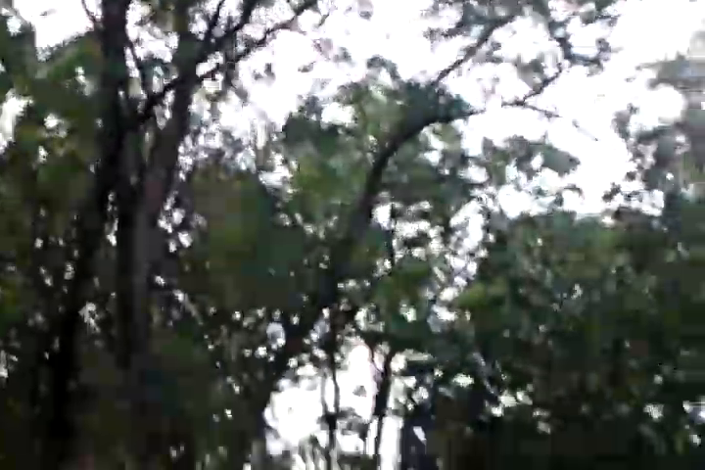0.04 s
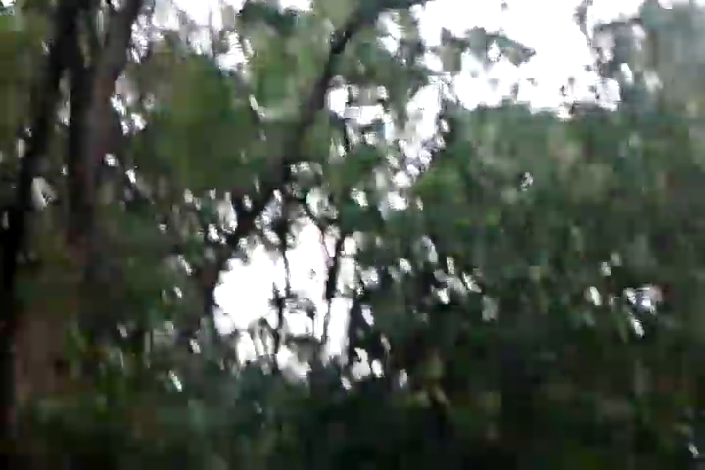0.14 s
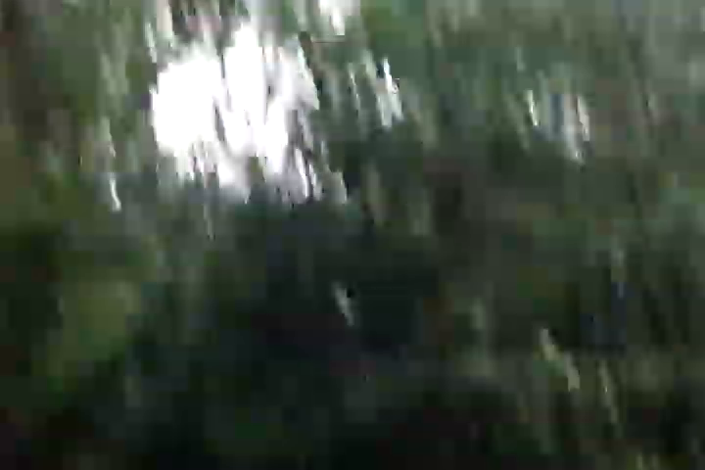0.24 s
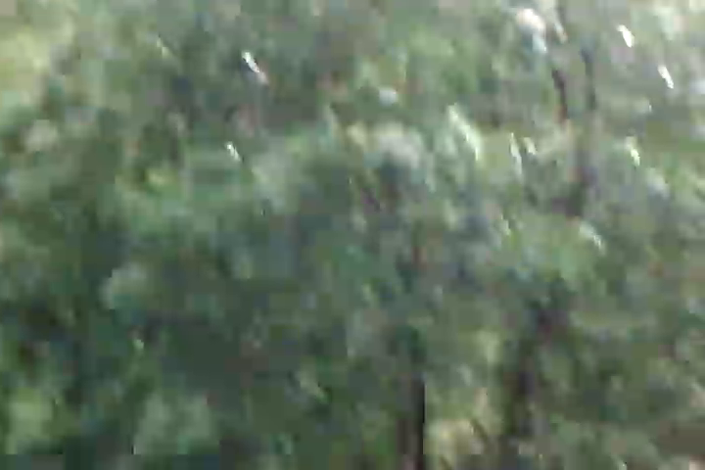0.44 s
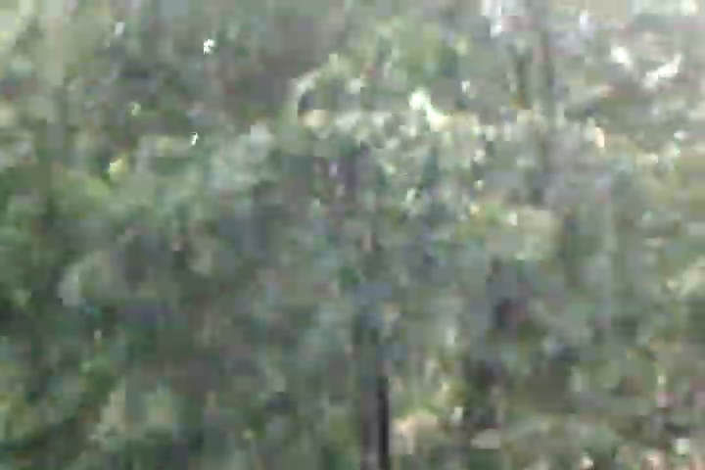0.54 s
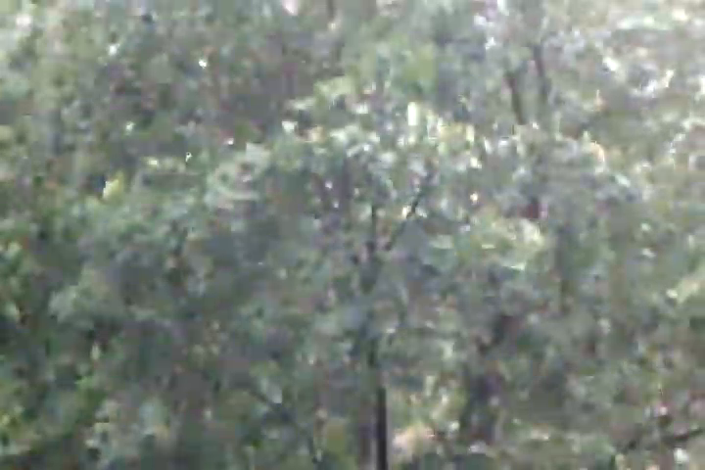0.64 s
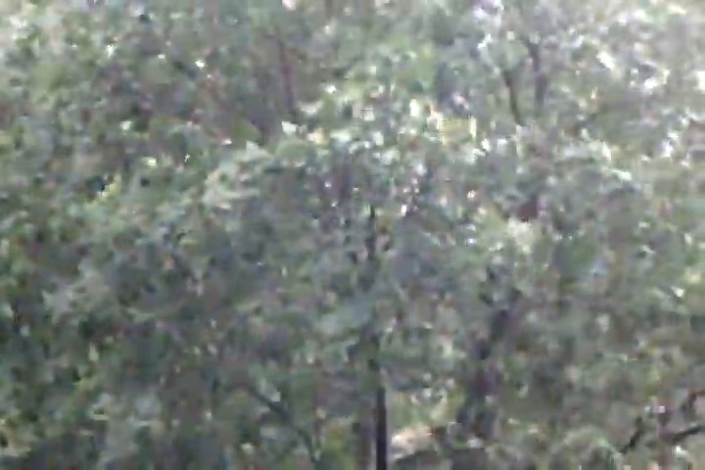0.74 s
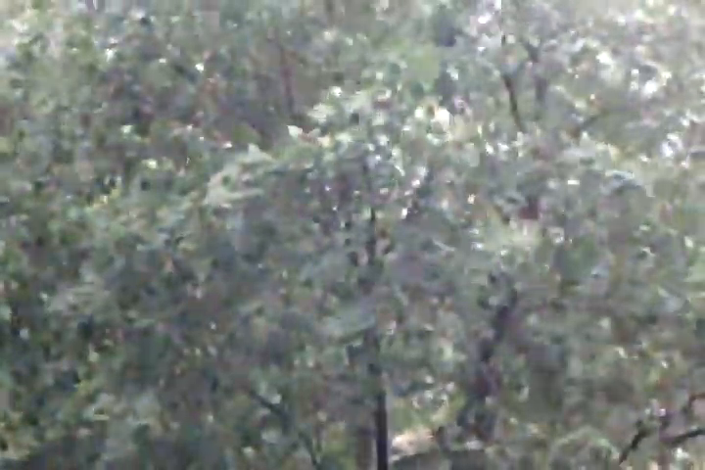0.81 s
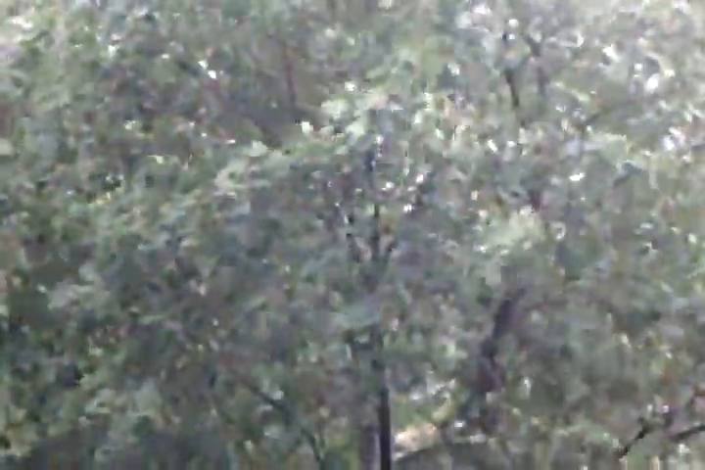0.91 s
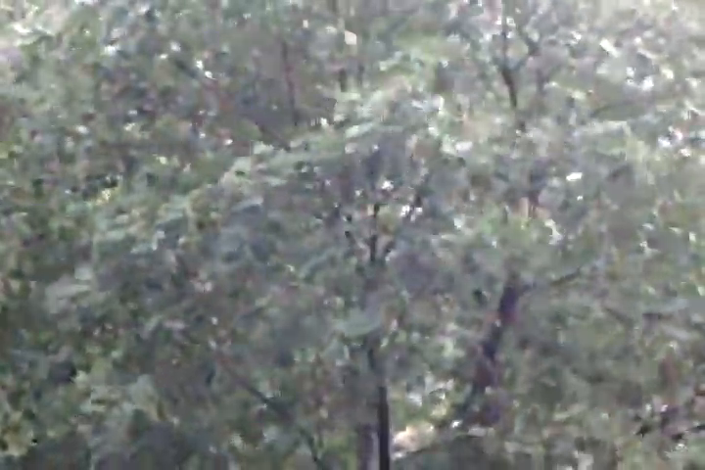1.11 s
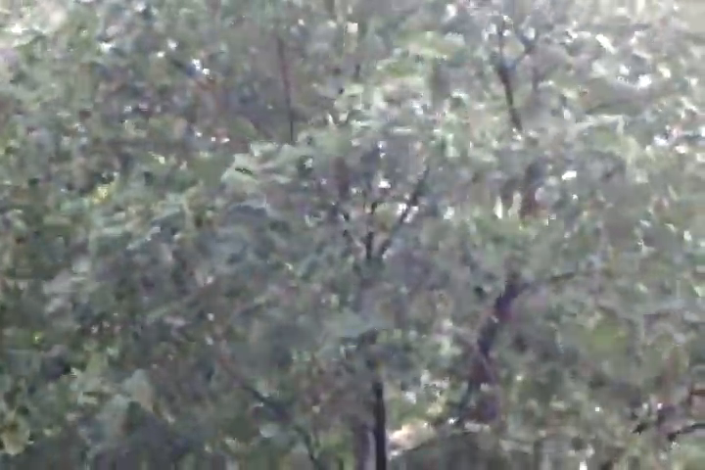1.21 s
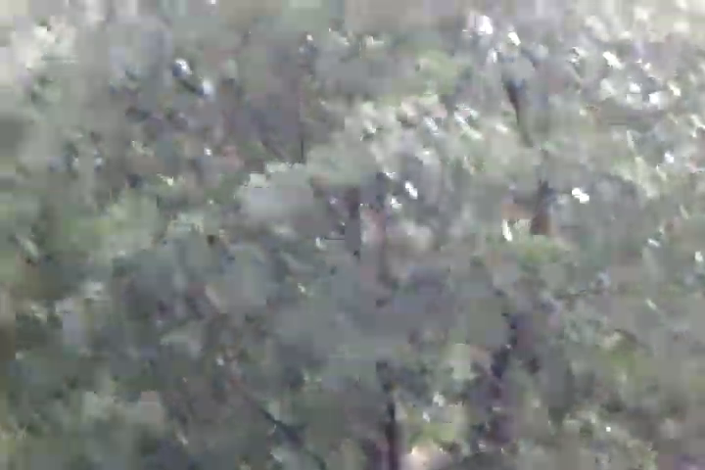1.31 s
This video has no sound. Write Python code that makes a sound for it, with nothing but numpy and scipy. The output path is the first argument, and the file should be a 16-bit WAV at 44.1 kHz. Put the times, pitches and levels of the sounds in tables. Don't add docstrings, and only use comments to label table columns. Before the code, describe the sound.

A steady downpour on trees all around, dull roar under fine leaf patter; near the start a rapid cluster of very close clacks and cracks from gripping the device, the hardest distorting, then mostly undisturbed rain.

```python
import sys
import numpy as np
from scipy import signal
from scipy.io import wavfile

SR = 44100
rng = np.random.default_rng(int(sys.argv[2]) if len(sys.argv) > 2 else 0)


def volts_from_decibels(level):
    exponent = np.asarray(level, float) / 20
    return 10 ** exponent


def store_wav(level_fs):
    pcm = np.round(np.clip(np.atleast_2d(level_fs), -1, 1) * 32767)
    wavfile.write(sys.argv[1], SR, pcm.T.astype(np.int16))


N = 59535

# time in seconds, level in dB.
RAIN_STRENGTH = [
    (0.0, -37),
    (0.202, -35),
    (0.322, -33),
    (0.946, -34.5),
    (1.35, -34),
]
# frequency in Hz, density in dB per Hz.
ROAR_SPECTRUM = [(35, -64), (60, -41), (109, -14), (205, -5.5), (244, -2), (512, -0.5), (629, 0),
                 (1670, -8), (2600, -17.5), (3380, -43), (5720, -120)]
# frequency in Hz, density in dB per Hz.
PATTER_SPECTRUM = [(1500, -24), (2600, 0.5), (3900, 0), (5000, -3.5), (6300, -10), (8500, -4), (11000, -10),
                   (14000, -18.5)]
# time in seconds, level in dB.
GRIP_PRESSURE = [
    (.17, -39),
    (.205, -39),
    (.235, -27),
    (.262, -26.5),
    (.3, -37.5),
    (.35, -30),
    (.41, -38.5),
    (.47, -32),
    (.53, -60),
]
# frequency in Hz, bandwidth in Hz, level in dB.
CASE_MODES = [
    (241, 93, -6.5),
    (600, 370, -0.2),
    (1046, 750, -4),
    (2060, 1250, -4),
    (3800, 2200, -15.5),
]
# time of peak in seconds, peak level in dB, pitch in Hz,
# length in cycles, pitch sag per cycle.
CASE_KNOCKS = [(.194, -25, 600, 2.1, 0.059), (0.2263, -13, 600, 1.62, 0.16), (.233, -29, 700, 0.99, .05),
               (.243, -18, 750, 1, .05), (0.2459, -49, 890, 2.2, .05), (.2568, -6.5, 860, 0.97, 0.072),
               (.266, -47, 710, 5.8, 0.09), (.271, -30, 705, 1.5, .05), (.298, -29, 705, 6.3, 0.079),
               (0.317, -42, 510, 2.8, .05), (0.3342, -15, 520, 1.2, 0.59), (.3368, -24.5, 270, 1.7, 0.11),
               (.35, -22, 380, 1.4, 0.13), (0.3965, -15, 700, 3.8, 0.66), (.4015, -31, 644, 0.72, .1),
               (0.4513, -12.5, 564, 1.4, 0.51), (0.4551, -23, 420, 0.9, .1),
               (.4675, -16.5, 860, 0.99, 0.12), (.508, -49, 400, 2.2, 0.12), (.755, -26.5, 1310, 3.1, 0.15)]
# time of peak in seconds, peak level in dB, pitch in Hz,
# length in cycles, level of the crack in dB relative to the ring.
CASE_SNAPS = [(.23803, -5.5, 2450, 1.9, -30), (.23803, -12, 4500, 2.8, -25), (.239, -17, 3300, 2.6, -25),
              (.25456, 6, 1950, 1.3, -22), (.25535, -8, 3650, 3.1, -25), (.25445, -13, 5200, 2.1, -8),
              (.331, -18, 2400, 2.1, -18), (.4728, -16, 1900, 1.3, -5), (.4738, -21, 2000, 2.8, -12),
              (.2128, -27, 2800, 2.1, -12), (.2225, -22, 2500, 4.1, -20), (.226, -24, 2400, 4.1, -20),
              (.3463, -22, 4000, 3.1, -14), (.3804, -21, 1600, 2.1, -10), (.3803, -24, 4500, 3.1, -8),
              (.3937, -23, 2800, 2.1, -10), (.4676, -22, 2800, 1.6, -7), (.7528, -27, 2600, 2.1, -12),
              (1.147, -28, 3200, 2.1, -10)]


def at_hz(points, hz):
    table_hz, table_db = np.transpose(points)
    return np.interp(np.log(hz), np.log(table_hz), table_db)


def in_time(rows):
    return np.interp(np.arange(N) / SR, *np.transpose(rows))


def rms_one(x):
    return x / np.sqrt(np.mean(x ** 2) + 1e-20)


def drift(rate_hz):
    stride, settle = 40, 2000
    r = np.exp(-2 * np.pi * rate_hz * stride / SR)
    white = rng.standard_normal(N // stride + settle + 2)
    slow = signal.lfilter([1], [1, -2 * r, r * r], white)[settle:]
    return np.interp(np.arange(N) / stride, np.arange(len(slow)), rms_one(slow - slow.mean()))


def clicks(per_s, uneven_db):
    sizes = volts_from_decibels(uneven_db * np.minimum(rng.exponential(1, N), 4))
    signs = rng.choice([-1, 1], N)
    struck = rng.random(N) < per_s / SR
    return sizes * signs * struck + 1e-18


def resonance(x, hz, width_hz):
    r = np.exp(-np.pi * width_hz / SR)
    zeros = np.array([1, 0, -1]) * (1 - r * r) / 2
    poles = [1, -2 * r * np.cos(2 * np.pi * hz / SR), r * r]
    return signal.lfilter(zeros, poles, x)


def banded_noise(spectrum, patchy_db):
    settle = 8000
    lowest_hz, highest_hz = spectrum[0][0], spectrum[-1][0]
    edges = 35 * 2 ** np.arange(0, 9, 1 / 3)
    white = rng.standard_normal((2, N + settle))
    together = drift(8)
    out = 0
    for k, (low, high) in enumerate(zip(edges, edges[1:])):
        hz = np.sqrt(low * high)
        octaves_beyond = max(np.log2(lowest_hz / hz), np.log2(hz / highest_hz), 0)
        bandpass = signal.butter(2, [low, high], "band", fs=SR, output="sos")
        band = signal.sosfilt(bandpass, white[k % 2])[settle:]
        flicker_db = patchy_db * (0.39 * together + drift(21))
        out = out + band * volts_from_decibels(at_hz(spectrum, hz) - 30 * octaves_beyond + flicker_db)
    return rms_one(out)


def grains(train, spectrum, low_hz, high_hz, cycles, count=16):
    dealt = rng.integers(0, count, N)
    out = 0
    for k, hz in enumerate(np.geomspace(low_hz, high_hz, count)):
        impacts = train * (dealt == k) + 1e-18
        ring = resonance(impacts, hz, hz / cycles)
        out = out + volts_from_decibels(at_hz(spectrum, hz)) * resonance(ring, hz, hz)
    return rms_one(out)


def rain():
    roar = volts_from_decibels(-3.5) * banded_noise(ROAR_SPECTRUM, patchy_db=1.4)
    hiss = volts_from_decibels(-7.5) * banded_noise(PATTER_SPECTRUM, patchy_db=0.23)
    small_impacts = clicks(per_s=2800, uneven_db=-4.5)
    drops = volts_from_decibels(-13.5) * grains(small_impacts, PATTER_SPECTRUM, 1930, 10750, cycles=3.0)
    fat_impacts = clicks(per_s=330, uneven_db=4.0)
    drips = volts_from_decibels(-16) * grains(fat_impacts, ROAR_SPECTRUM, 266, 1700, cycles=3.7)
    return volts_from_decibels(in_time(RAIN_STRENGTH)) * (roar + hiss + drops + drips)


def creak():
    body = 0
    for hz, width_hz, db in CASE_MODES:
        slips = clicks(per_s=2500, uneven_db=3.5)
        ring = resonance(resonance(slips, hz, width_hz), hz, 2 * width_hz)
        body = body + volts_from_decibels(db + 3.47 * drift(54)) * rms_one(ring)
    return volts_from_decibels(in_time(GRIP_PRESSURE)) * rms_one(body)


def wavelet(s, hz, cycles, sag, steep=2):
    c = np.clip((np.arange(N) / SR - s) * hz, -9, 9)
    steepness = np.where(c < 0, steep, 4 / steep)
    shape = np.exp(-abs(2 * c / cycles) ** steepness)
    sagged = c - sag * c * c / 2 / (1 + abs(sag * c))
    return shape * np.cos(2 * np.pi * sagged), shape


def knocks():
    out = 0
    for s, db, hz, cycles, sag in CASE_KNOCKS:
        tone, _ = wavelet(s, hz, cycles, sag)
        out = out + volts_from_decibels(db) * tone
    bass_cut = signal.butter(1, 120, "high", fs=SR, output="sos")
    return signal.sosfilt(bass_cut, out)


def snaps():
    crack_band = signal.butter(1, [1800, 3760], "band", fs=SR, output="sos")
    noise = rms_one(signal.sosfilt(crack_band, rng.standard_normal(N)))
    out = 0
    for s, db, hz, cycles, crack_db in CASE_SNAPS:
        ring, shape = wavelet(s, hz, cycles, sag=0, steep=3)
        out = out + volts_from_decibels(db) * (ring + volts_from_decibels(crack_db) * shape * noise)
    return out


def scene():
    return (rain() + creak() + knocks() + snaps())[None]


def low_pass(x):
    return signal.sosfilt(signal.butter(12, 14400, fs=SR, output="sos"), x)


def record(dry):
    bass_cut = signal.butter(2, 91, "high", fs=SR, output="sos")
    x = signal.sosfilt(bass_cut, dry)
    mix = 1.03 * x / (1 + np.abs(x) ** 4) ** 0.25
    return low_pass(mix)


dry = scene()
out = record(dry)
store_wav(out)
```